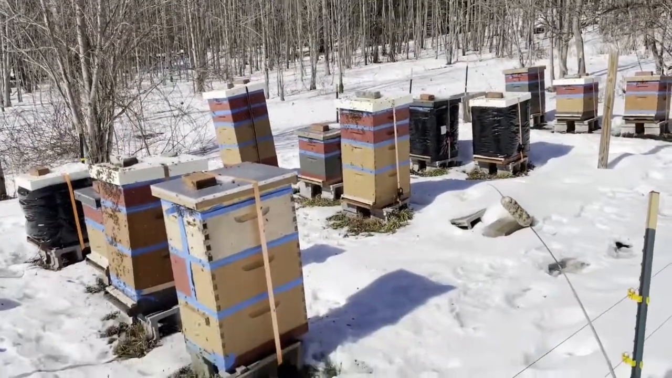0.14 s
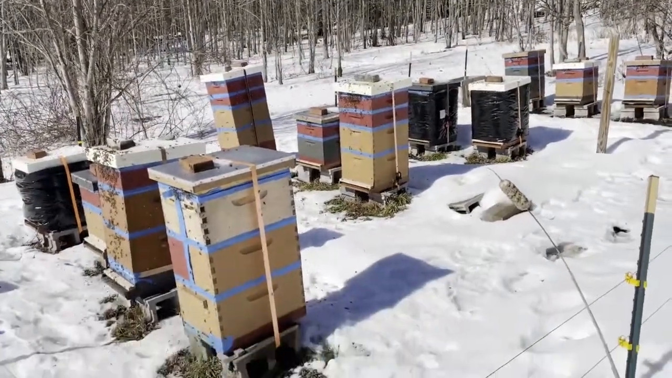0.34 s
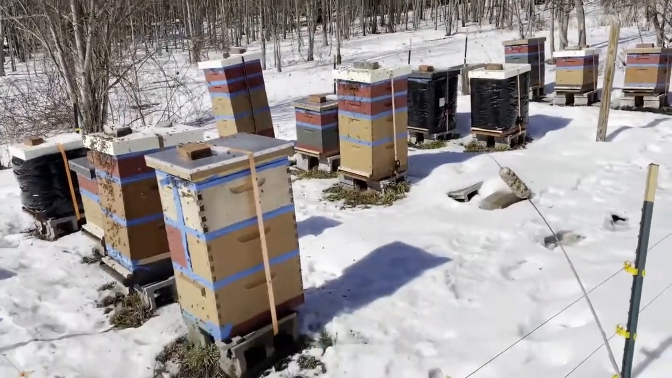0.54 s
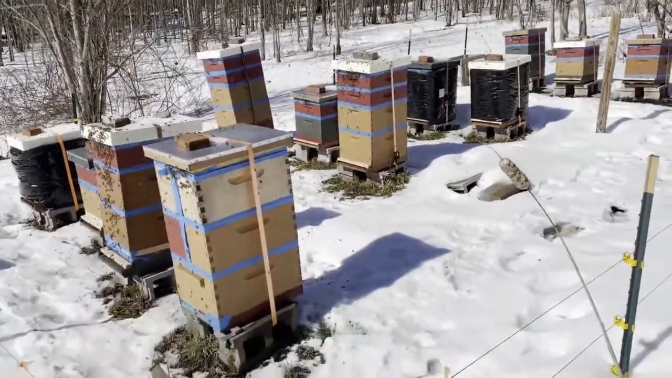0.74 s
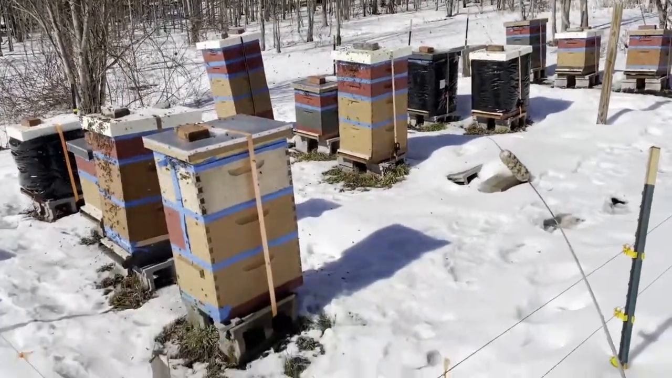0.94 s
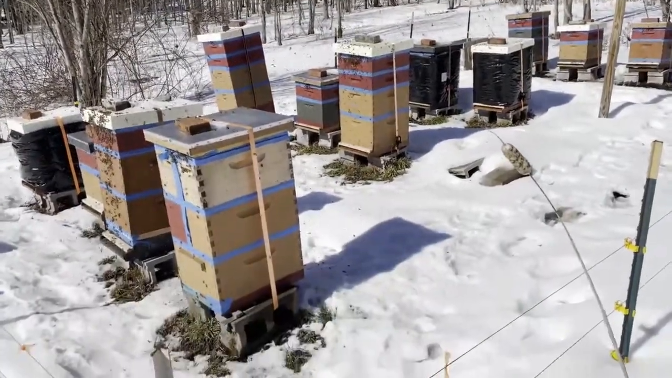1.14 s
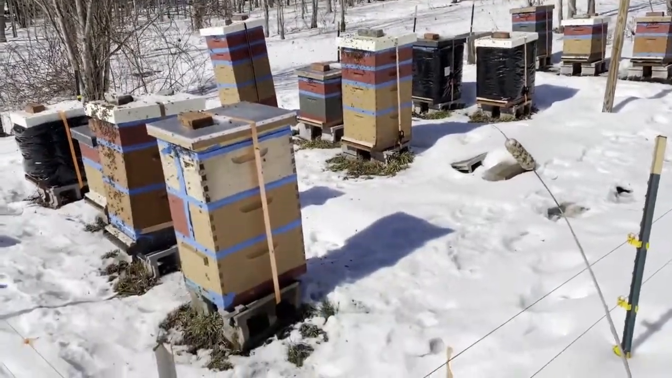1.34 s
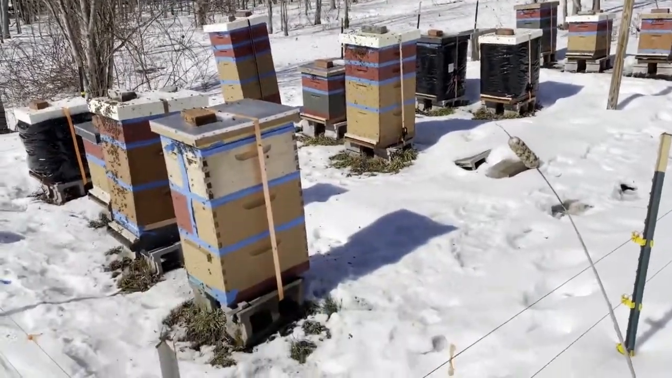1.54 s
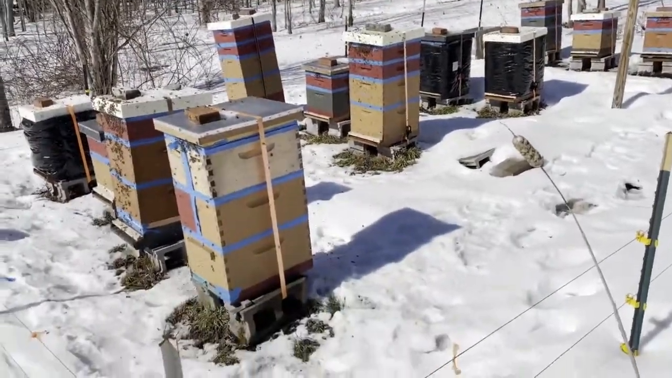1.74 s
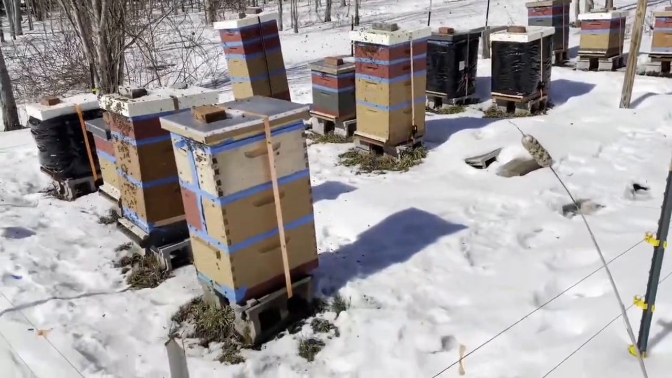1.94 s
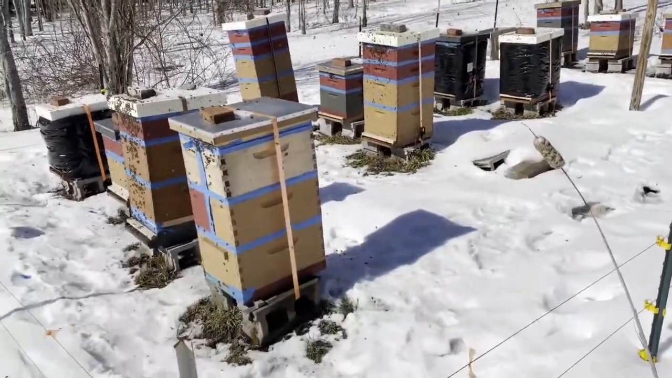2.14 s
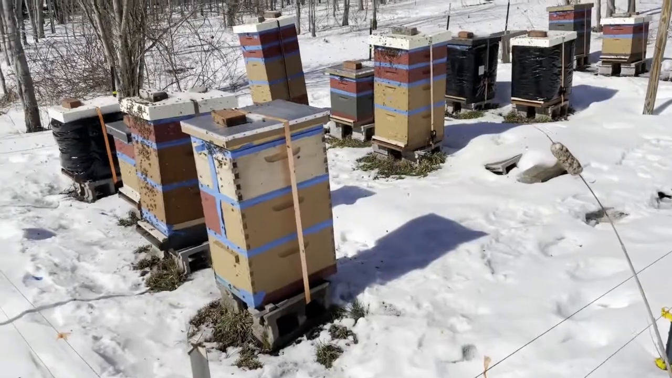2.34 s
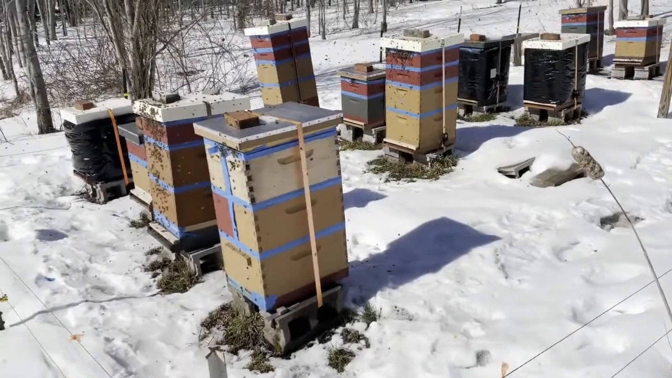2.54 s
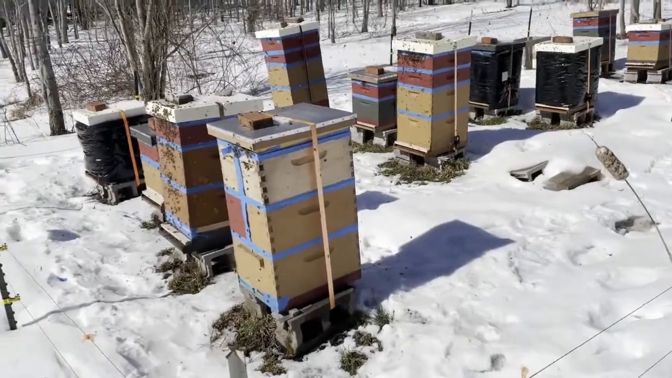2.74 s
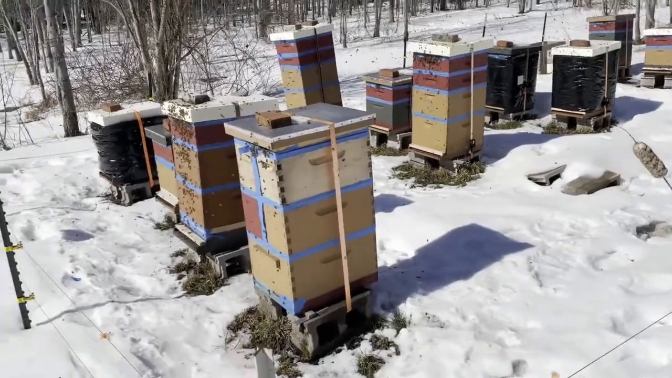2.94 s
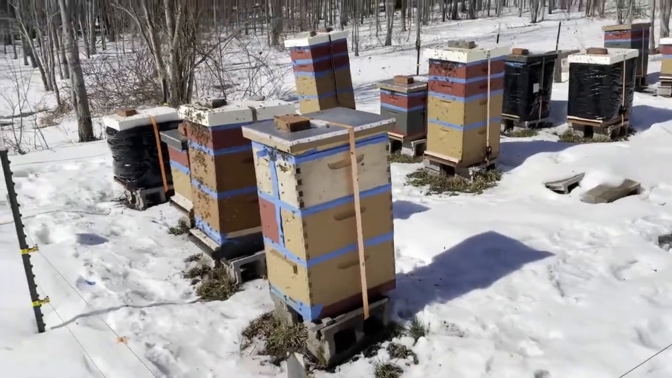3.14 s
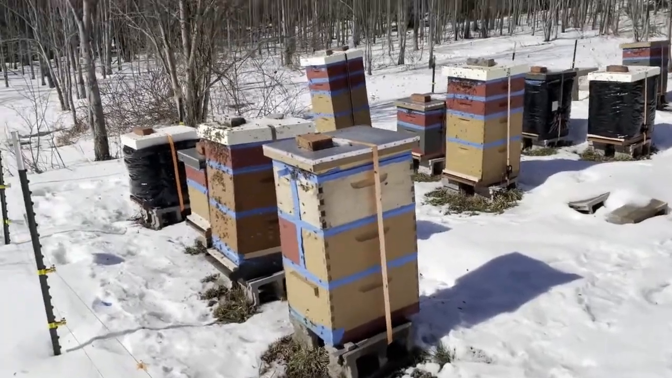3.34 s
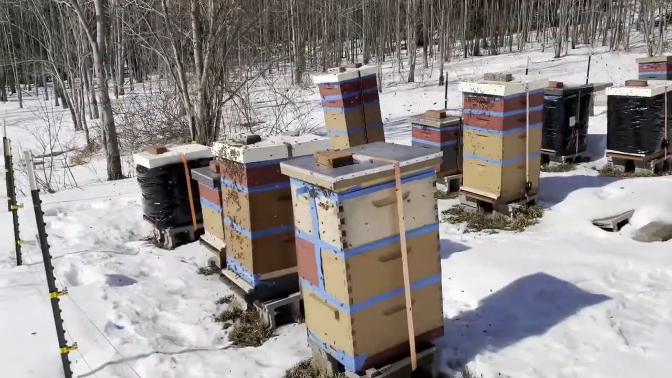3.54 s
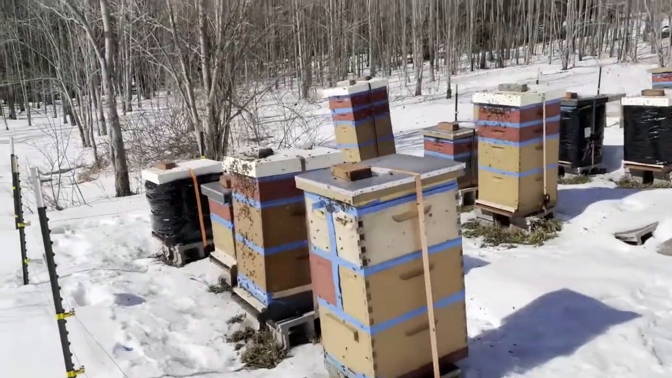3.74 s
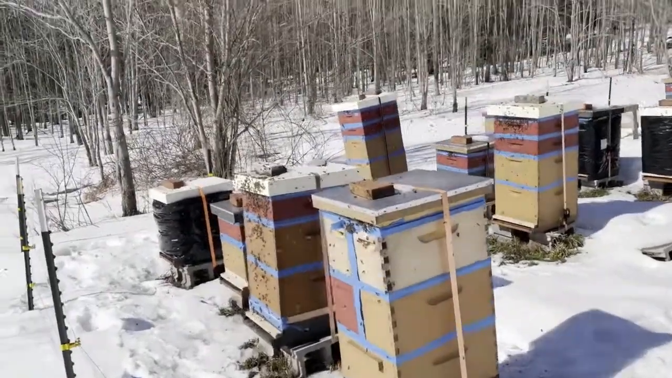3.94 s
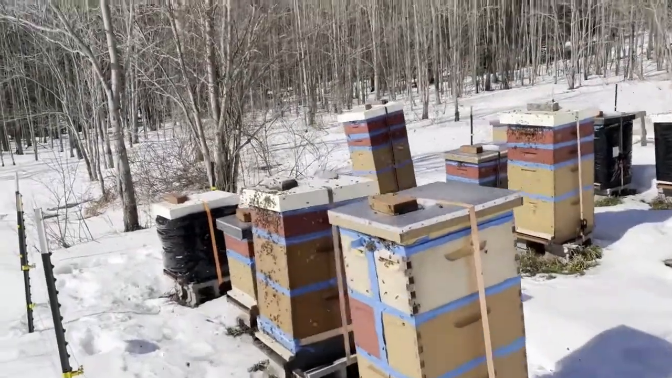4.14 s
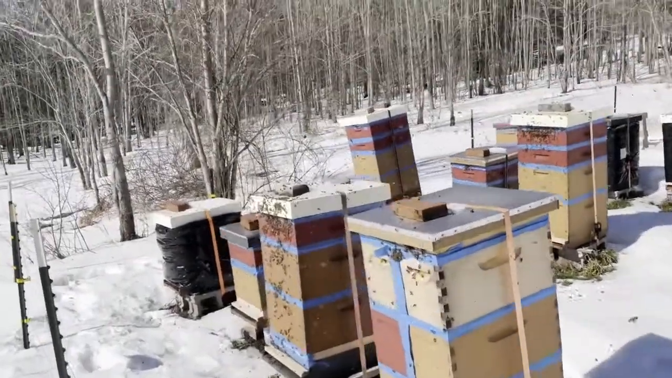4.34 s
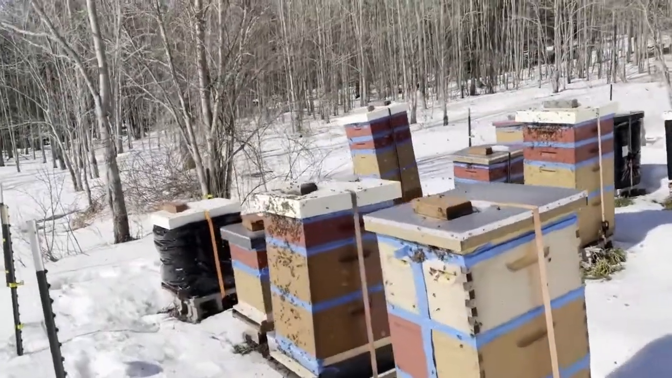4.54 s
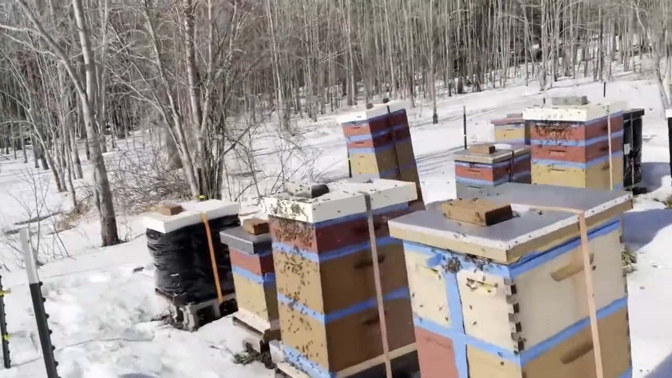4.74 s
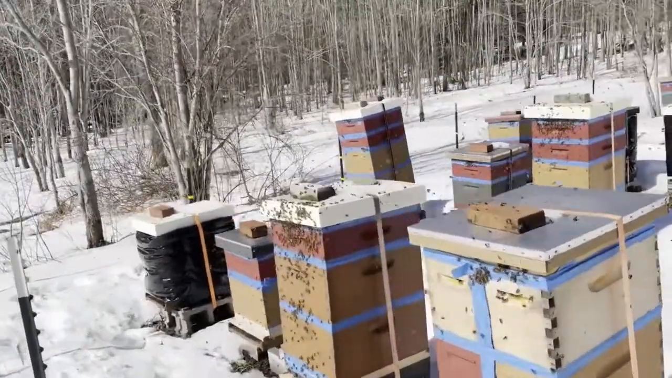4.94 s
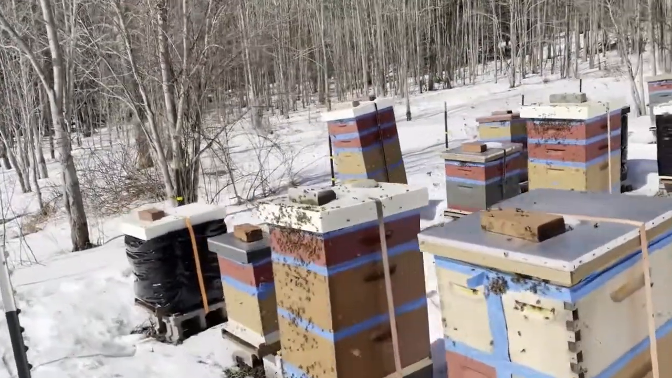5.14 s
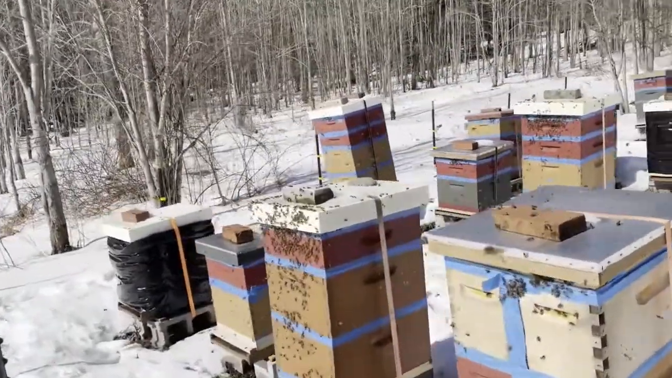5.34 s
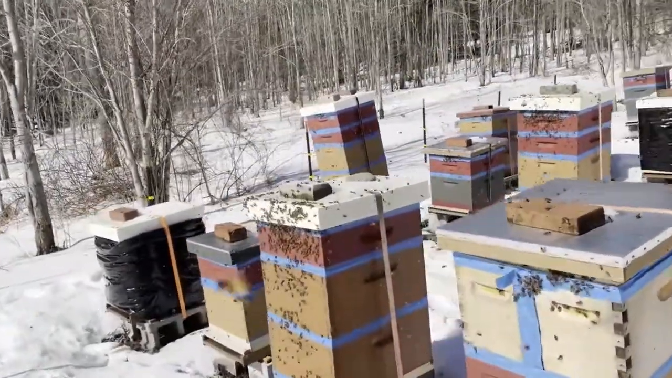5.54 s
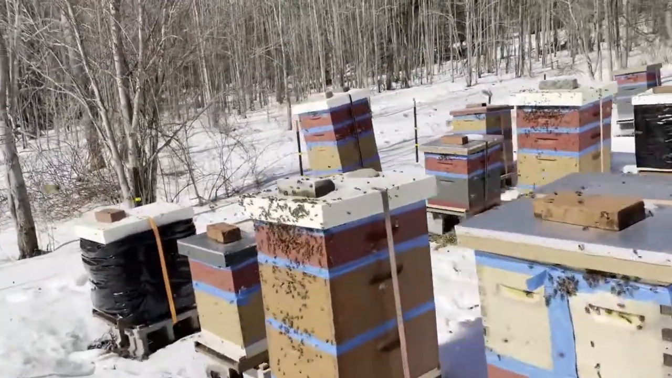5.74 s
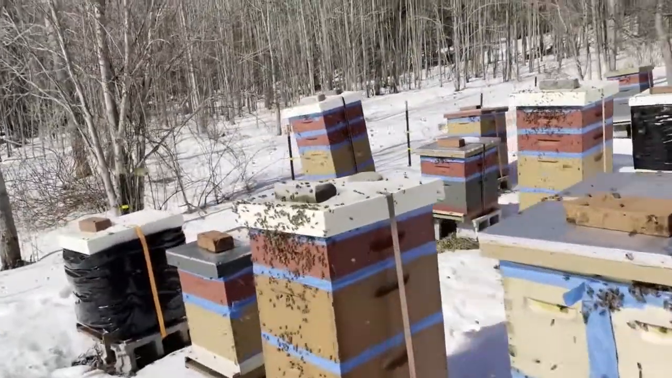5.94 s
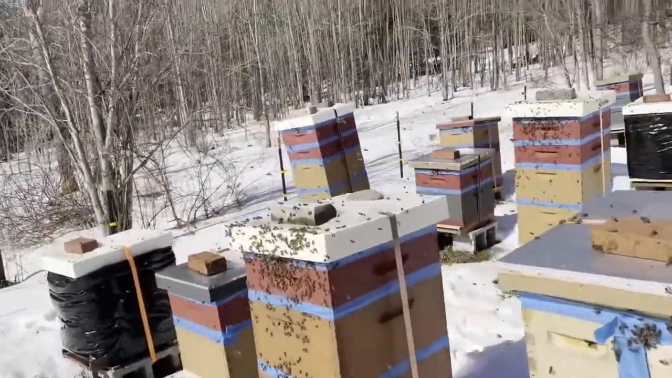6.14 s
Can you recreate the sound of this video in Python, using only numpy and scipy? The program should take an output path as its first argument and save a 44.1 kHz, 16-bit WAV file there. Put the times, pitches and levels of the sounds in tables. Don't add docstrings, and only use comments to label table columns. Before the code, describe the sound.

A soft swarm drone with thumping breeze and sharp fence snaps gives way to crunching snow steps and one loud, very close bee brush.

```python
import sys
import numpy as np
from scipy import signal
from scipy.fft import rfft, irfft
from scipy.io import wavfile

SR = 44100
rng = np.random.default_rng(int(sys.argv[2]) if len(sys.argv) > 2 else 0)


def undo_db(level):
    steps = np.asarray(level, float) / 20
    return 10 ** steps


def inscribe(sig):
    pcm = np.round(np.clip(np.atleast_2d(sig).T, -1, 1) * 32767)
    wavfile.write(sys.argv[1], SR, pcm.astype(np.int16))


N = 272964

# multiple of beat rate, level in dB.
WING_HARMONICS = [(1, 1), (2, -0.5), (3, -4), (4, -3.5), (5, -5.5), (6, -12), (7, -16.5), (8, -19.5),
                  (9, -26), (10, -23), (12, -26)]
# time in seconds, level of second harmonic in dB.
HUM_LEVEL = [(0.0, -64), (0.6, -62.5), (1.07, -65.5), (1.48, -63.5), (2.83, -63.5), (3.34, -66),
             (3.78, -66.5), (3.93, -59), (4.1, -60), (4.95, -56), (5.39, -64.5), (5.88, -60.5), (6.19, -70)]
# frequency in Hz, likeness as a ratio.
STEREO_LIKENESS = [(60, 0.89), (160, 0.29), (270, 0.71), (700, 0.54), (2000, 0.54), (5000, 0.37)]
# time in seconds, peak in dB, frequency in Hz.
STRONG_EDDIES = [(0.007, -26, 65), (0.148, -26.5, 134), (0.181, -22, 61.6), (0.289, -28.5, 57.5),
                 (0.377, -29.5, 107), (0.478, -25, 70), (0.537, -30, 84), (0.641, -35.5, 93),
                 (0.86, -38.5, 151), (0.975, -39.5, 260), (1.0, -38, 70), (1.147, -40.5, 226),
                 (4.39, -36.5, 100), (2.03, -39, 119), (2.167, -35, 80.8), (4.325, -43, 150),
                 (2.667, -33, 123), (2.789, -31, 115), (3.157, -40, 59.5), (4.554, -30.5, 84),
                 (4.697, -29, 210), (4.748, -22, 126), (4.784, -25, 239), (4.877, -32.5, 134),
                 (4.905, -26.5, 110), (2.275, -40, 70), (5.001, -26, 170), (5.346, -36, 66.6),
                 (5.421, -29, 88), (5.633, -31, 138)]
# frequency in Hz, level in dB per Hz.
RUMBLE_SPECTRUM = [(25, -15), (45, 5), (70, 5.5), (110, -1), (180, -9.5), (300, -17), (500, -51.5)]
# time in seconds, level in dB.
GUST_LEVEL = [(0.0, -39.5), (0.4, -51), (0.65, -52.5), (1.45, -62.5), (1.58, -71), (1.8, -72), (1.88, -58),
              (2.15, -53), (2.4, -65.5), (2.78, -54), (3.2, -67.5), (3.32, -70.5), (3.66, -71.5),
              (3.76, -55), (4.3, -51.5), (5.05, -41.5), (5.58, -47), (5.9, -57)]
# frequency in Hz, level in dB per Hz.
WOOD_SPECTRUM = [(100, -5.5), (350, 3.5), (640, -1), (1300, 2.5), (2000, -6), (3000, -8.5), (5700, -14.5),
                 (8500, -11.5), (11300, -21), (13000, -21.5), (15300, -16.5), (16000, -22)]
# time in seconds, peak in dB, body frequency in Hz,
# snap in dB, thud in dB.
KNOCKS_AND_CRACKS = [(0.0, -36, 625, -47.5, -36), (0.567, -37, 730, -68, -39),
                     (2.737, -43.5, 780, -68, -56), (3.151, -39.5, 715, -66, -42.5),
                     (3.222, -43.5, 770, -67, -55), (3.728, -42, 980, -58, -37.5),
                     (3.757, -42.5, 883, -57, -37), (3.78, -42, 800, -65, -37),
                     (3.853, -28, 654, -63, -24.5), (3.895, -33.5, 930, -51, -33),
                     (3.942, -37, 775, -56, -35), (4.168, -49, 1240, -56, -63),
                     (4.449, -27.5, 860, -45, -22.5), (4.52, -37.5, 931, -65, -41),
                     (4.59, -33.5, 800, -64, -35), (4.713, -49, 670, -47.5, -32.5),
                     (4.753, -31.5, 584, -61, -32), (4.775, -34, 590, -56, -32.5),
                     (5.689, -40.5, 956, -44, -44), (5.748, -37, 608, -67, -43),
                     (5.794, -36, 1280, -44.5, -53), (5.905, -39.5, 1460, -45, -51),
                     (5.954, -38, 840, -62, -50), (6.007, -40, 1030, -48, -61)]
# time in seconds, peak in dB, low part in dB, 6 kHz part in dB.
SPARKS_AND_TAPS = [
    (0.7663, -26, -18, 7.5),
    (1.8493, -37.5, -18, -17),
    (2.9319, -25, -14.5, -33),
    (3.215, -44, -25, -29),
    (4.0142, -20.5, -16, -30),
    (5.097, -23, -36, -9),
    (5.426, -40.5, -7, 13),
    (5.4723, -29, -7, 12),
]
# frequency in Hz, level in dB, T60 in seconds.
SPARK_HIGH_MODES = [(9050, 0, 0.00064), (12400, -18, 0.0017), (15200, -4.5, 0.0011)]
# frequency in Hz, level in dB, T60 in seconds.
SPARK_LOW_MODES = [(1880, 5.5, 0.0016), (3250, 4.5, 0.0011), (4150, -3, 0.002)]
# time in seconds, peak in dB, wing rate in Hz,
# passing time in seconds, left over right in dB.
BEE_PASSES = [(5.047, -7, 249, 0.0067, 7), (4.6, -40.5, 255, 0.039, 3), (5.076, -21, 196, 0.0096, 4),
              (5.092, -31.5, 207, .016, 7), (5.14, -39, 218, .04, 5), (5.56, -47, 340, 0.032, -3),
              (5.5, -51, 258, 0.074, -1), (1.48, -53, 220, 0.093, 0), (1.73, -55.5, 230, 0.078, -2),
              (2.2, -51.5, 280, 0.043, 0), (3.12, -57, 262, 0.048, -2)]
# multiple of beat rate, level in dB.
NEAR_WING_HARMONICS = [(1, -1), (2, 0), (3, -8), (4, -18), (5, -24), (6, -33), (8, -42), (12, -56)]
# frequency in Hz, level in dB per Hz.
WING_TIP_SPECTRUM = [(500, 3), (1100, 3.5), (2200, -12.5), (4500, -19), (10000, -19), (16000, -26)]
# frequency in Hz, level in dB per Hz.
WAKE_SPECTRUM = [(60, -16), (200, -4), (385, 0), (560, -7), (900, -11), (1300, -17), (2200, -32),
                 (4000, -45), (16000, -65)]
# start in seconds, hold in seconds, crush in dB, hiss in dB.
BOOT_STEPS = [(3.64, 0.1, -59, -65), (3.726, 0.12, -50.5, -60), (3.88, 0.12, -53.5, -63.5),
              (4.518, 0.096, -46.5, -52.5), (4.708, 0.0071, -46, -54), (4.768, 0.4, -58, -66),
              (5.094, .2, -59, -65.5), (5.307, 0.079, -55, -58), (5.41, .2, -57, -64.5),
              (5.612, 0.083, -47, -57.5), (5.742, 0.0038, -41.5, -56), (5.782, 0.076, -48.5, -58),
              (5.896, 0.022, -44.5, -55), (5.944, 0.22, -42, -56)]
# frequency in Hz, level in dB per Hz.
CRUSH_SPECTRUM = [(150, -1), (400, 1.5), (900, 2.5), (1500, 1.5), (2900, -5), (4000, -13.5), (5500, -27),
                  (8000, -20.5)]
# frequency in Hz, level in dB per Hz.
SLIDE_SPECTRUM = [(1500, -24), (3000, -13), (4000, 0), (5200, 1), (6300, -7), (8400, -10), (11300, -11),
                  (13000, -14), (16000, -15)]

WING_HZ, WING_SPREAD_HZ = 256.1, 13
EDDY_CYCLES = 0.91
SMALL_EDDIES_PER_S, SMALL_EDDY_DB, SMALL_LOW_HZ, SMALL_HIGH_HZ = 14, 10.5, 70, 233
WOOD_DB, STEADY_TOP_HZ = -58, 15800
BOOTS_FROM_S = 3.6
KNOCK_T60_S, KNOCK_SIDE_DB = 0.025, 2.5
CRACK_T60_S, CRACK_SIDE_DB = 0.065, -8
THUD_LAG_S, THUD_HZ, THUD_CYCLES = 0.0059, 337, 0.83
REBOUND_LAG_S, REBOUND_DB, REBOUND_HZ, REBOUND_CYCLES = 0.016, -3.5, 183, 1.27
NEAR_FIELD_DB, WING_TIP_DB = -30, -25
WAKE_DB, WAKE_T60_S = -21.5, 0.16
TRAIL_LAG_S, TRAIL_GAP_S, TRAIL_DB, TRAIL_LOSS_DB = 0.0127, 0.035, -16.5, 8.5
TRAIL_HZ, TRAIL_RATIO = 158, 1.05
PRESS_S, LIFT_DB_PER_S, PATCHY_DB, BOOT_SIDE_DB = 0.011, 429, 1.45, -3.5
PORT_SPLIT_HZ, CUTOFF_HZ = 6100, 16300
PORT_LAG_SAMPLES, PORT_ALIGN_HZ = 6.3, 10950


def rms_one(x):
    return x / np.sqrt(np.mean(x ** 2) + 1e-20)


def in_time(rows):
    s, *columns = np.transpose(rows)
    return [np.interp(np.arange(N) / SR, s, c) for c in columns]


def at_log(points, where):
    x, y = np.array(points).T
    return np.interp(np.log(where), np.log(x), y)


def white():
    return rng.standard_normal(N)


def drift(rate_hz):
    r = np.exp(-80 * np.pi * rate_hz / SR)
    slow = signal.lfilter([1], [1, -2 * r, r * r], rng.standard_normal(N // 40 + 2002))[2000:]
    return np.interp(np.arange(N) / 40, np.arange(len(slow)), rms_one(slow - slow.mean()))


def coloured(x, spectrum):
    hz = np.arange(N // 2 + 1) * SR / N + 1
    return rms_one(irfft(rfft(x) * undo_db(at_log(spectrum, hz)), N))


def wide(mid, side):
    hz = np.arange(N // 2 + 1) * SR / N + 1
    alike = np.clip(at_log(STEREO_LIKENESS, hz), 0, 1)
    mid = rfft(mid) * np.sqrt(1 + alike)
    side = rfft(side) * np.sqrt(1 - alike)
    return irfft(np.array([mid + side, mid - side]) * (hz < STEADY_TOP_HZ), N) / np.sqrt(2)


def pan(x, db):
    return np.array([x * undo_db(db / 2), x * undo_db(-db / 2)])


def ring(clicks, hz, t60_s):
    r, w = undo_db(-60 / (t60_s * SR)), 2 * np.pi * hz / SR
    return signal.lfilter([0, np.sin(w)], [1, -2 * r * np.cos(w), r * r], clicks + 1e-18)


def wing_beat(cycles, harmonics, count=12):
    turn, k = np.arange(513) / 512, np.arange(1, count + 1)
    waves = np.cos(2 * np.pi * (k[:, None] * turn + rng.random((count, 1))))
    return np.interp(cycles % 1, turn, undo_db(at_log(harmonics, k)) @ waves)


def swirls(rows, cycles):
    out = np.zeros((2, N))
    for (s, peak_db, hz), (phase, side) in zip(rows, rng.random((len(rows), 2))):
        reach_s = 3 * cycles / hz
        at = np.arange(max(0, int((s - reach_s) * SR)), min(N, int((s + reach_s) * SR)))
        turns = (at / SR - s) * hz
        envelope = np.exp(-(turns / cycles / 0.87) ** 2)
        swirl = envelope * np.cos(2 * np.pi * (turns - 0.2 * turns ** 2 + phase))
        out[:, at] += pan(undo_db(peak_db) * swirl, 3 * (side - 0.5))
    return out


def swarm(count=34):
    out = np.zeros((2, N))
    for k, odd in enumerate(rng.standard_normal(count)):
        hz = WING_HZ + WING_SPREAD_HZ * (0.7 * odd + 0.7 * drift(2.5) + 0.349 * drift(13.85))
        nearness = undo_db(3.5 * np.minimum(drift(5), 1.3))
        out[k % 2] += wing_beat(np.cumsum(hz) / SR, WING_HARMONICS) * nearness
    return undo_db(in_time(HUM_LEVEL)[0] + 7) * wide(rms_one(out[0]), rms_one(out[1]))


def wind():
    rumble_db = in_time(GUST_LEVEL)[0]
    lumps = [coloured(white() * undo_db(2.5 * drift(18)), RUMBLE_SPECTRUM) for _ in range(2)]
    gap, size, pitch = rng.random((200, 3)).T
    s = np.cumsum(gap + 0.5) / SMALL_EDDIES_PER_S
    level_db = rumble_db[np.minimum(s * SR, N - 1).astype(int)] + SMALL_EDDY_DB - 8 * size
    hz = SMALL_LOW_HZ * (SMALL_HIGH_HZ / SMALL_LOW_HZ) ** pitch
    eddies = swirls(STRONG_EDDIES, EDDY_CYCLES) + swirls(np.transpose([s, level_db, hz]), EDDY_CYCLES)
    return undo_db(rumble_db + 4.5) * wide(*lumps) + eddies


def wood():
    return undo_db(WOOD_DB) * wide(*[coloured(white(), WOOD_SPECTRUM) for _ in range(2)])


def knocks_and_cracks():
    out, t = np.zeros((2, N)), np.arange(SR // 8) / SR
    top = signal.butter(2, [2800, 11500], "band", fs=SR, output="sos")
    for s, peak_db, hz, snap_db, _ in KNOCKS_AND_CRACKS:
        boot = s > BOOTS_FROM_S
        decay = undo_db(-60 * t / (CRACK_T60_S if boot else KNOCK_T60_S))
        burst = rng.standard_normal(len(t)) * decay * np.minimum(t / 0.00046, 1)
        body = ring(burst, hz, 2.85 / hz)
        snap = signal.sosfilt(top, burst)
        crack = undo_db(peak_db + 1) * body / np.abs(body).max()
        crack += undo_db(snap_db + 6) * snap / np.abs(snap).max()
        start = round(s * SR)
        out[:, start:start + len(t)] += pan(crack, CRACK_SIDE_DB if boot else KNOCK_SIDE_DB)
    thuds = [(s + THUD_LAG_S, db, THUD_HZ) for s, *_, db in KNOCKS_AND_CRACKS]
    rebounds = [(s + REBOUND_LAG_S, db + REBOUND_DB, REBOUND_HZ) for s, *_, db in KNOCKS_AND_CRACKS]
    return out + swirls(thuds, THUD_CYCLES) + swirls(rebounds, REBOUND_CYCLES)


def sparks():
    s, peak_db, low_db, edge_db = np.transpose(SPARKS_AND_TAPS)
    out, at = np.zeros(N), np.round(s * SR).astype(int) + 50
    modes = [(*m, 1.5) for m in SPARK_HIGH_MODES] + [(*m, low_db) for m in SPARK_LOW_MODES]
    modes.append((5980, 0, 0.0027, edge_db - 18.5))
    for hz, level_db, t60_s, extra_db in modes:
        clicks = np.zeros(N)
        lag = round(3e4 / np.sqrt(hz) / 30)
        clicks[at + lag] = undo_db(peak_db + extra_db + level_db)
        out += ring(ring(clicks, hz, t60_s), hz, t60_s) * 38 / (t60_s * SR)
    return out + undo_db(-29) * np.roll(out, round(0.0087 * SR))


def bee_passes():
    out, t = np.zeros((2, N)), np.arange(N) / SR
    for s, peak_db, hz, passing_s, side_db in BEE_PASSES:
        span = slice(max(0, int((s - 0.6) * SR)), int((s + 0.6) * SR))
        along = (t[span] - s) / passing_s
        near = (1 + along ** 2) ** -1.2
        cycles = np.cumsum(hz * (1 - 0.043 * np.tanh(along))) / SR
        beat = wing_beat(cycles, NEAR_WING_HARMONICS if peak_db > NEAR_FIELD_DB else WING_HARMONICS)
        left, right = pan(undo_db(peak_db) * near * beat / np.abs(beat).max(), side_db)
        out[:, span] += [left, np.roll(right, 7)]
    return out


def boots():
    grains = undo_db(2.5 * np.minimum(rng.exponential(1, (4, N)), 5)) * rng.choice([-1, 1], (4, N))
    grains = grains * (rng.random((4, N)) < 5000 * undo_db(2.8 * drift(45)) / SR)
    now, weight = np.arange(N) / SR, []
    for s, hold_s, *_ in BOOT_STEPS:
        lift = undo_db(-LIFT_DB_PER_S * np.clip(now - s - PRESS_S - hold_s, 0, 1))
        weight.append(np.clip((now - s) / PRESS_S, 0, 1) * lift)
    levels = undo_db(np.transpose(BOOT_STEPS)[2:])
    crush, hiss = np.sqrt(levels ** 2 @ np.array(weight) ** 2)
    crush = crush * undo_db(PATCHY_DB * drift(16.5))
    hiss = hiss * undo_db(PATCHY_DB * drift(6.6))
    snaps = wide(*[coloured(g, CRUSH_SPECTRUM) for g in grains[:2]])
    slide = wide(*[coloured(g, SLIDE_SPECTRUM) for g in grains[2:]])
    return pan(crush, BOOT_SIDE_DB) * snaps + hiss * slide


def brush_wake():
    s = BEE_PASSES[0][0]
    since = np.arange(N) / SR - s
    tips = undo_db(WING_TIP_DB) * coloured(white(), WING_TIP_SPECTRUM) * np.exp(-(since / 0.0065) ** 2)
    after = np.clip(since, 0, 1)
    level = undo_db(WAKE_DB - 60 * after / WAKE_T60_S) * np.minimum(after / 0.012, 1) * (after < 1)
    rattle = level * wide(*[coloured(white(), WAKE_SPECTRUM) for _ in range(2)])
    trail = [(s + TRAIL_LAG_S + TRAIL_GAP_S * k, TRAIL_DB - TRAIL_LOSS_DB * k, TRAIL_HZ * TRAIL_RATIO ** k)
             for k in range(3)]
    return tips + rattle + swirls(trail, EDDY_CYCLES)


def scene():
    air = swarm() + wind() + wood()
    return air + knocks_and_cracks() + sparks() + bee_passes() + boots() + brush_wake()


def top_cut(x):
    return signal.sosfilt(signal.butter(12, 17660, fs=SR, output="sos"), x)


def record(dry):
    hz = np.arange(N // 2 + 1) * SR / N
    high = 1 / (1 + (PORT_SPLIT_HZ / (hz + 1)) ** 24)
    low_pass = 1 / (1 + (hz / CUTOFF_HZ) ** 150)
    high_pass = 1 / np.sqrt(1 + (36 / (hz + 1)) ** 6)
    both = rfft(dry) * low_pass * high_pass
    early = np.exp(2j * np.pi * (hz - PORT_ALIGN_HZ) * PORT_LAG_SAMPLES / SR)
    treble = both[0] * high * [np.ones_like(hz), early]
    return top_cut(irfft(both * np.sqrt(1 - high ** 2) + treble, N))


dry = scene()
out = record(dry)
inscribe(out)
```